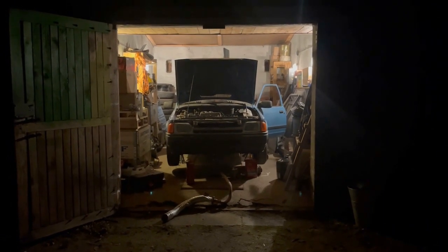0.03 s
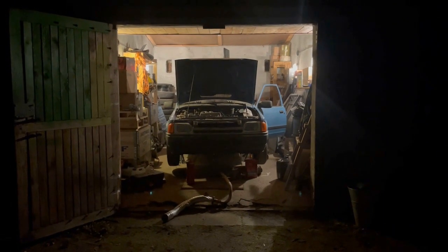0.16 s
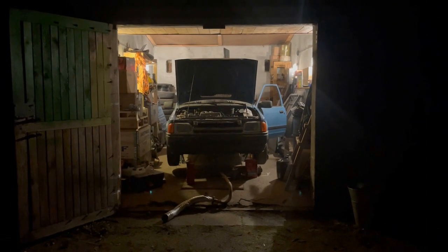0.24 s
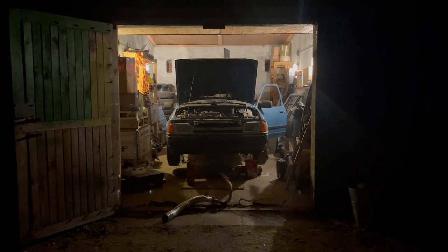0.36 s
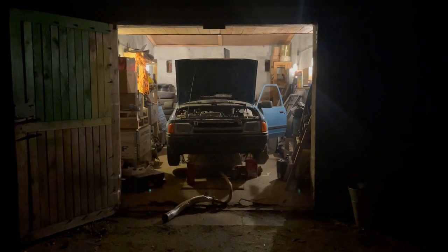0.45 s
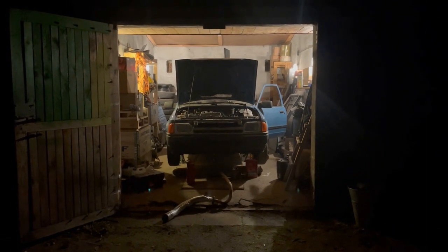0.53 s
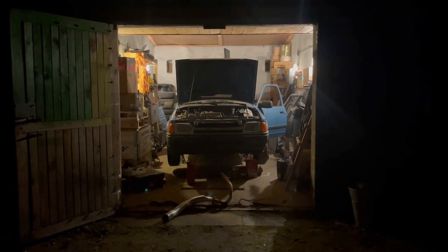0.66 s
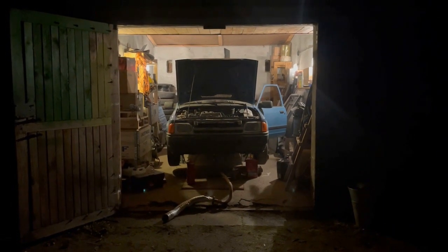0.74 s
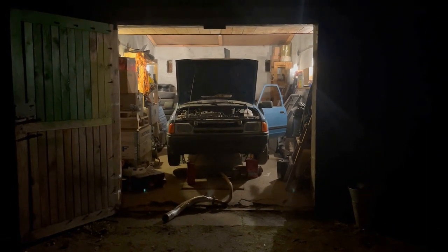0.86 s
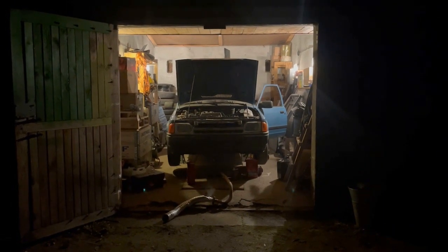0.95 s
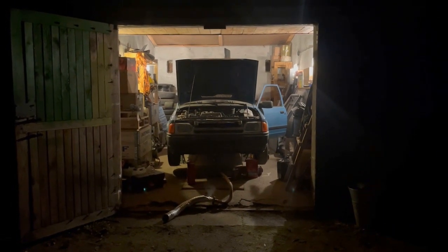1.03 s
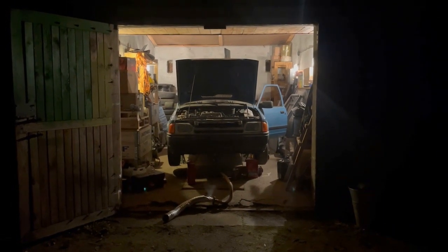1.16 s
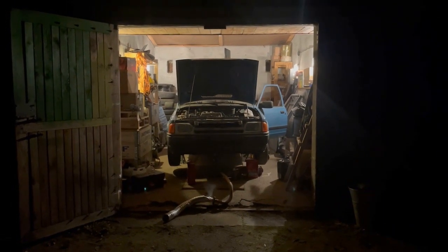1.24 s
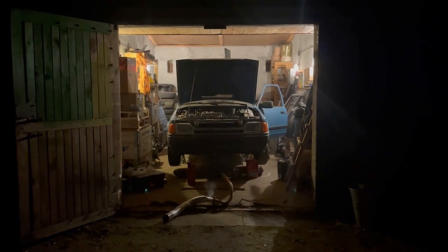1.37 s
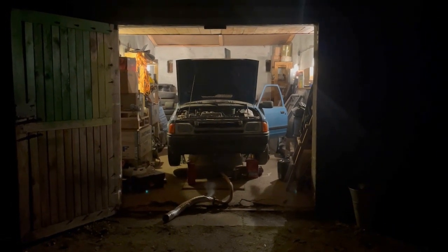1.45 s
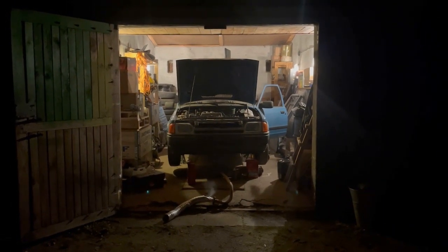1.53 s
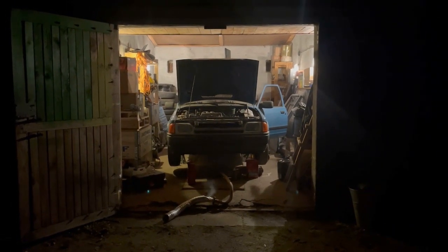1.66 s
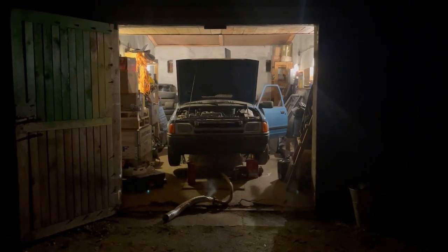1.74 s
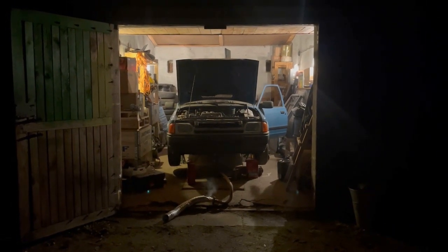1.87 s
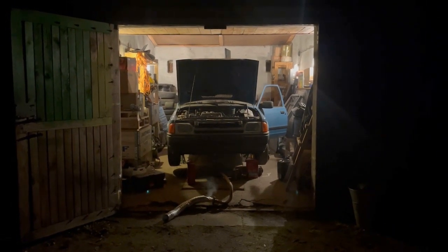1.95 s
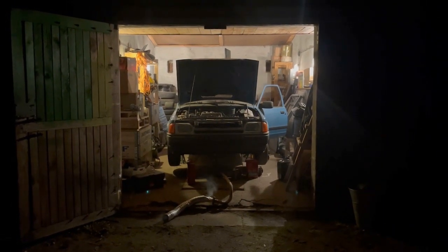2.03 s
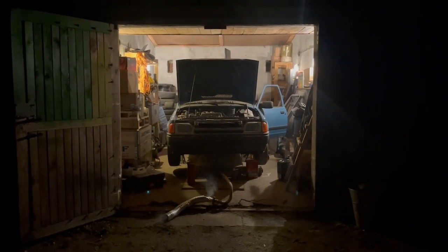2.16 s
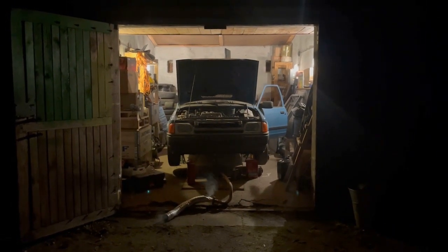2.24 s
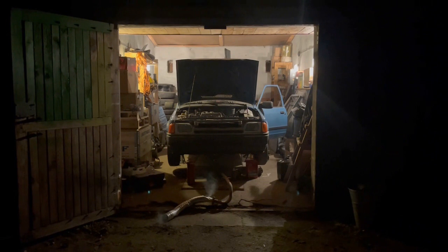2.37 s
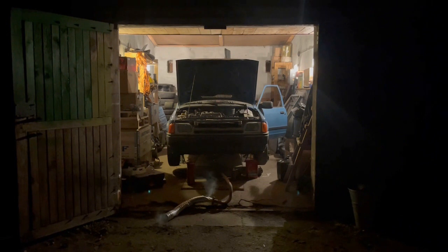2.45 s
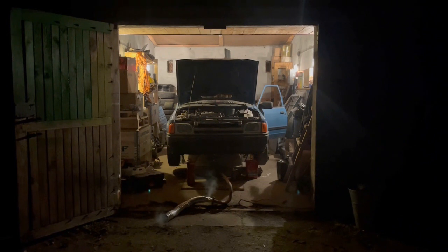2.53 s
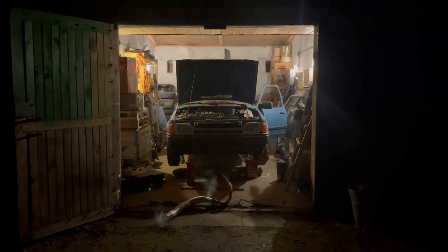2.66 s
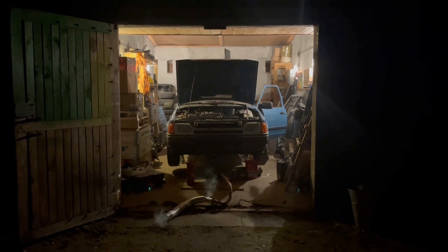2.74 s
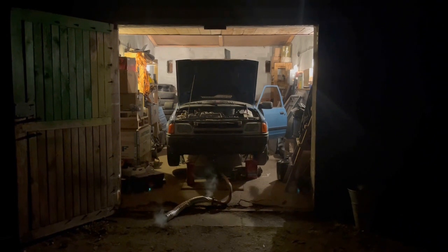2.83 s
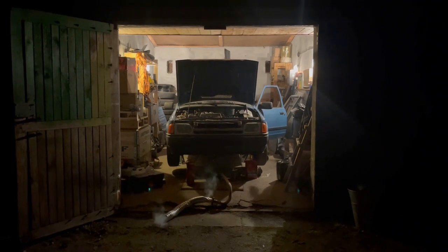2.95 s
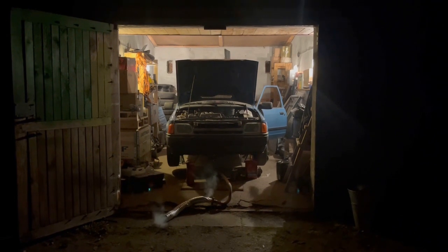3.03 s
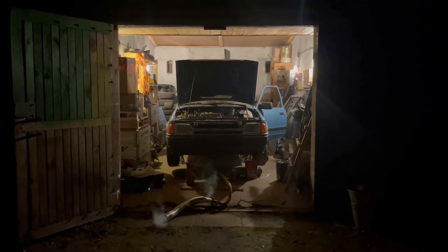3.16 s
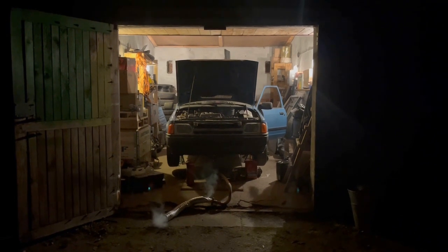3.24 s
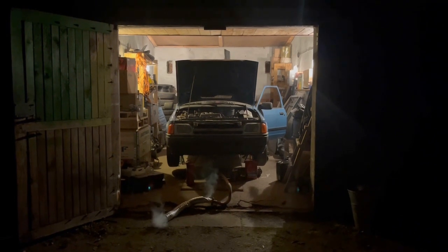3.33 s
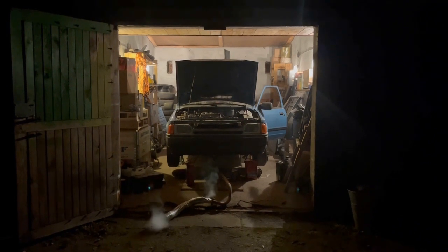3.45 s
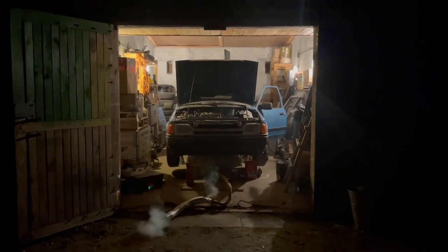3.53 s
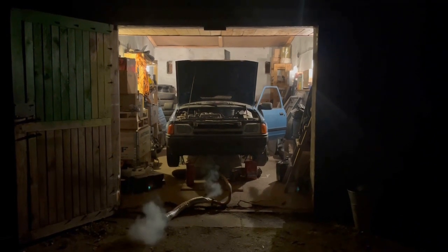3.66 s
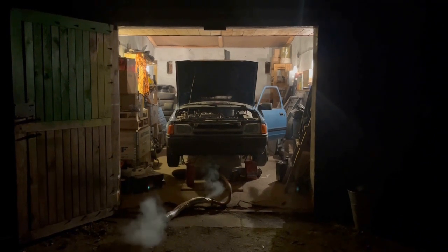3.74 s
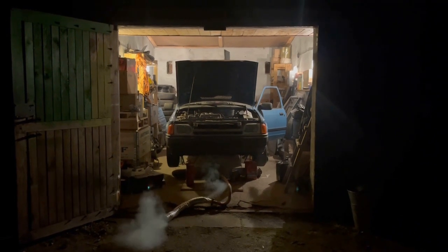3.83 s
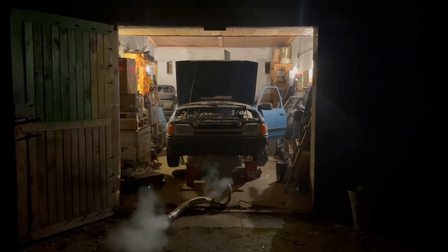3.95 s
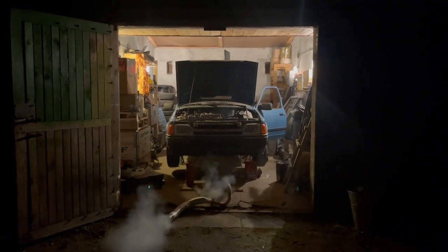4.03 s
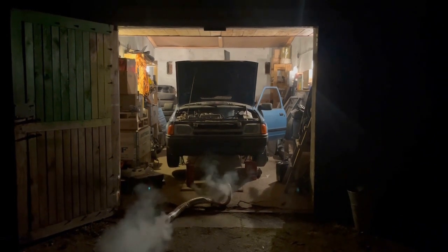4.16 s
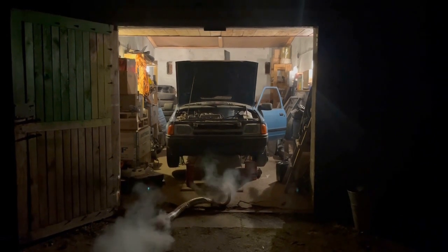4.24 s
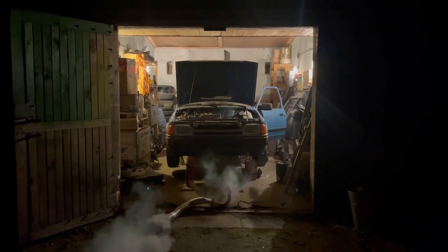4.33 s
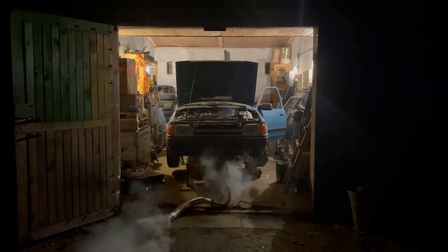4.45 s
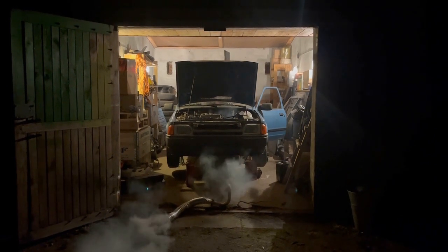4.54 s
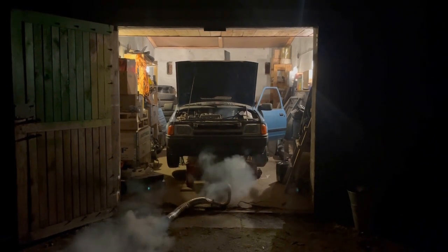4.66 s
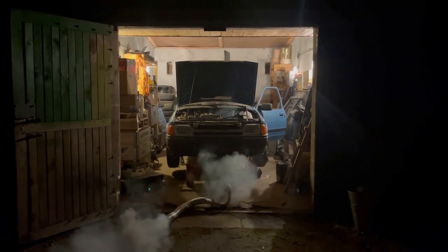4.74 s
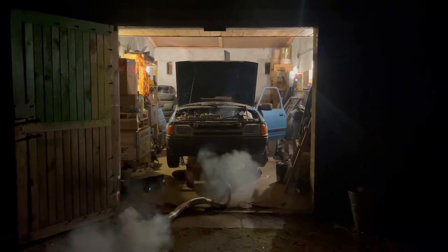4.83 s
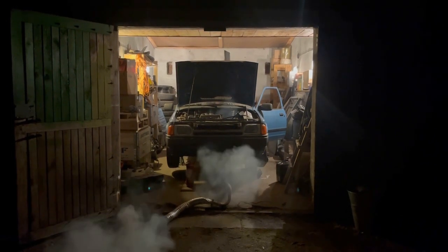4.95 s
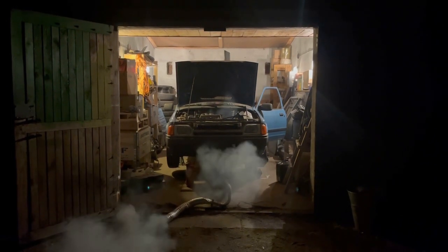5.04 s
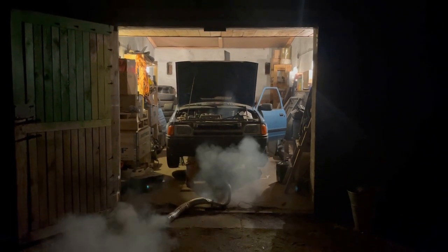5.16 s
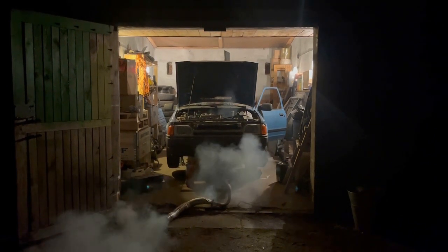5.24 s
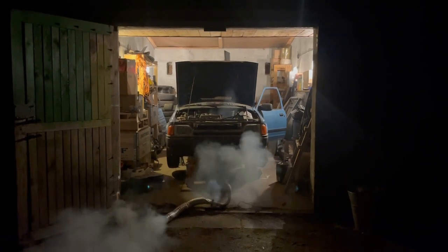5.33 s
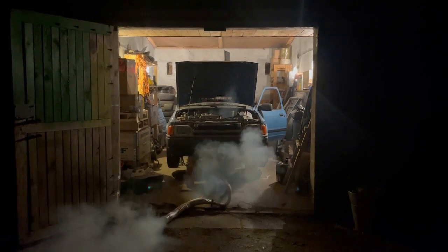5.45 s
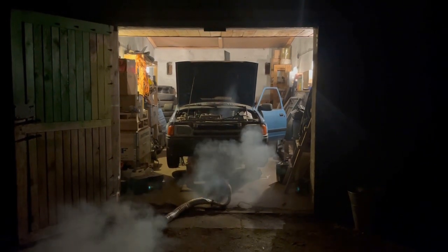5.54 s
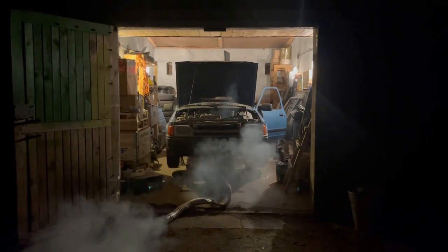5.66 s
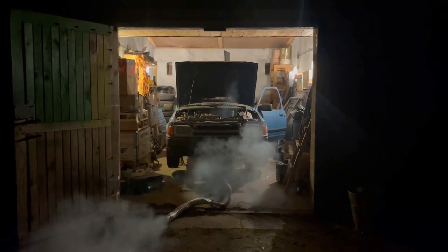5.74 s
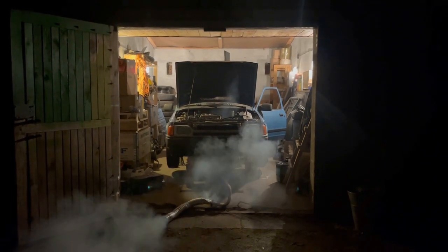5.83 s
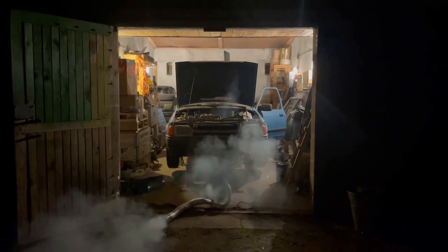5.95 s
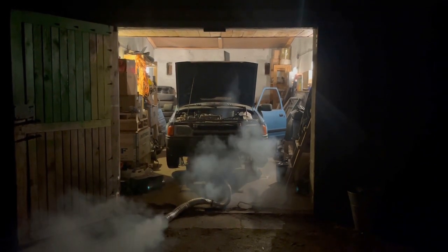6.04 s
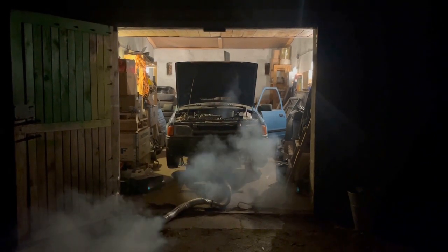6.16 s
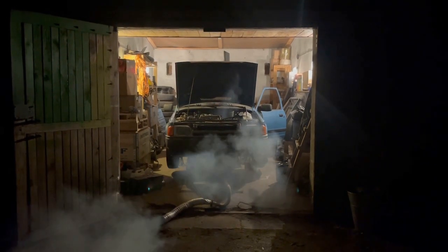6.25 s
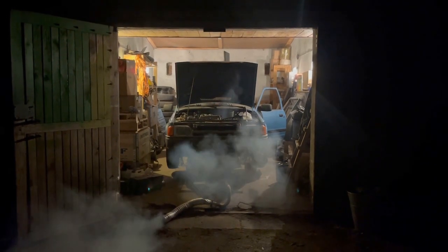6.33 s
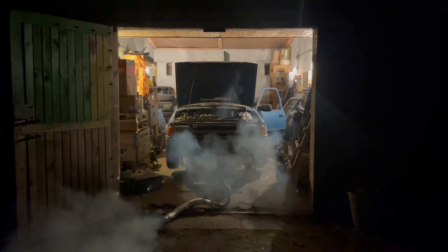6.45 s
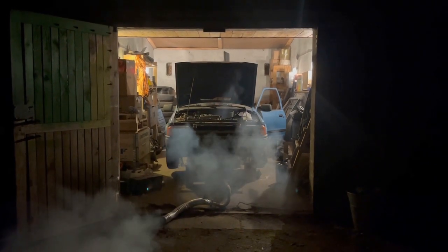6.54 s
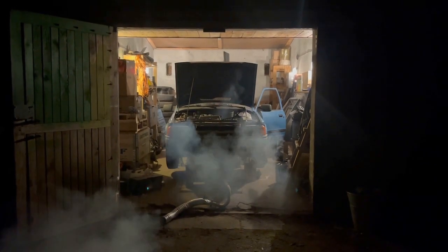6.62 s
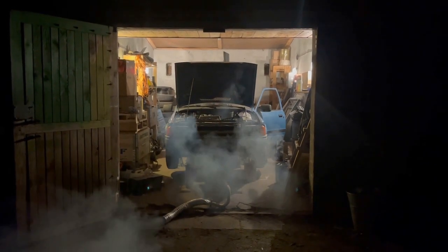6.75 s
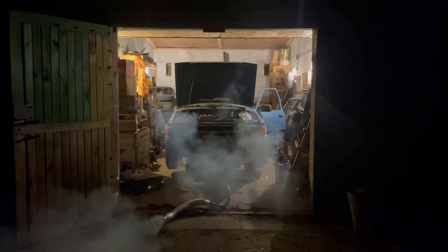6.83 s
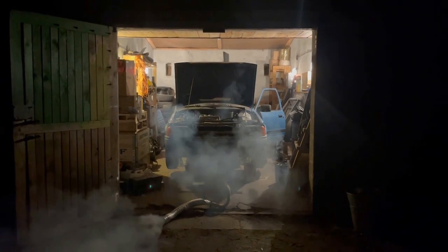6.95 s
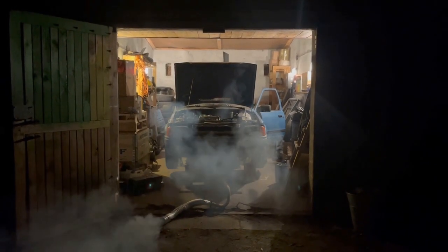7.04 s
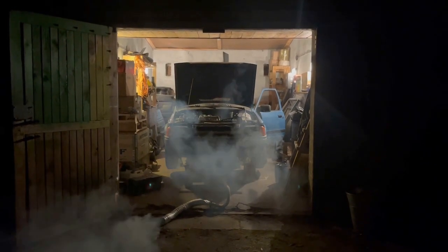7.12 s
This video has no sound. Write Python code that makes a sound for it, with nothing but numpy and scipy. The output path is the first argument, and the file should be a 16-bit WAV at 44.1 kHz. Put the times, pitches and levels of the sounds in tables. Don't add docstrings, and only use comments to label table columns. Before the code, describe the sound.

An old diesel in an open garage is heard from the yard in stereo, with faint steady air and short room reflections. From 0 to 3.4 seconds the starter turns it over about six times a second: gears bite and grind, the housing groans as it labours, then a thin whine lifts as the load lets go. At 3.4 the first separate firings crack and thump, growing harder and closer as the starter drops out by 3.6. Around 3.9 to 4.0 it catches with heavy booms and a gulp of intake air, then eases. A strong knocking push comes at 4.5 to 4.9, shorter ones at 5.2, 5.8 and 6.0 to 6.2, the last near 6.6 to 6.8 with a sharp intake rush. Between them it coasts with softer clatter, belt and fan hiss, wavering exhaust drone and hollow hose resonance, still hunting at the end, about 7.2.

```python
import sys
import numpy as np
from scipy import signal
from scipy.fft import rfft, irfft
from scipy.io import wavfile
from scipy.ndimage import uniform_filter1d

SR = 44100
rng = np.random.default_rng(int(sys.argv[2]) if len(sys.argv) > 2 else 0)


def master(y):
    cut = np.clip(np.atleast_2d(y).T, -1, 1)
    pcm = np.round(cut * 32767)
    wavfile.write(sys.argv[1], SR, pcm.astype(np.int16))


def gain_from_db(level_db):
    decades = np.asarray(level_db, float) / 20
    return 10 ** decades


N = 317079
TIME = np.arange(N) / SR

# (time [s], firings a second [Hz])
ENGINE = [(3.41, 21), (3.7, 25.2), (4.04, 50), (4.2, 66), (4.53, 42), (4.66, 54), (4.76, 55.2), (4.9, 86.4),
          (5.2, 48), (5.5, 73.7), (5.75, 42.6), (5.83, 60.3), (5.9, 53), (6.21, 82.6), (6.32, 84.5),
          (6.58, 74.3), (6.8, 102.6), (7.19, 57)]
# (start [s], end [s], effort at start [dB], effort at end [dB],
# unevenness while coasting afterwards [dB])
SURGES = [
    (3.407, 3.74, -26, -23, -30),
    (3.768, 4.127, -22.5, -28.5, -33),
    (4.33, 4.456, -37.5, -37.5, -41),
    (4.54, 4.859, -29.5, -26.5, -28.5),
    (5.237, 5.429, -28, -28, -28),
    (5.77, 5.943, -29, -34.5, -29),
    (6.026, 6.24, -32.5, -28.5, -62),
    (6.625, 6.768, -27, -29.5, -31),
]
# (time [s], crack [dB], panel pitch [Hz], boom [dB])
CATCHES = [(3.411, -20, 926, -19), (3.479, -20, 1830, -18.5), (3.538, -11, 1190, -23),
           (3.599, -13.5, 1210, -14.5), (3.654, -6, 1100, -16), (3.703, -7.5, 1050, -15),
           (3.749, -6.5, 1080, -15.5), (3.793, -8.5, 1110, -12), (3.829, -7, 1330, -16),
           (3.863, -9.5, 1300, -6), (3.894, -7.5, 1170, -15.5), (3.926, -7, 1085, -4),
           (3.951, -11, 1730, -3), (3.978, -11, 2180, -12), (4, -7, 1120, -10)]
# (time [s], crack [dB], panel pitch [Hz])
KNOCKS = [(4.04, -7, 1030), (4.078, -8.5, 1080), (4.096, -12.5, 1070), (4.112, -8, 1960),
          (4.145, -12.5, 1190), (4.54, -9.5, 1080), (4.566, -6, 1000), (4.588, -8.5, 2166),
          (4.61, -7.5, 1080), (4.649, -6, 1000), (4.736, -9.5, 1050), (4.783, -13.5, 1010),
          (4.828, -9, 1080), (5.188, -21.5, 1820), (5.227, -12.5, 1016), (5.247, -14, 1920),
          (5.281, -8, 1220), (5.376, -8.5, 1220), (5.42, -7.5, 1080), (5.754, -20, 1090),
          (5.775, -11.5, 1877), (5.811, -12.5, 1150), (5.863, -13.5, 1040), (5.909, -18, 1920),
          (6.063, -11.5, 1106), (6.133, -8, 1947), (6.197, -11.5, 1030), (6.607, -14.5, 1180),
          (6.632, -9.5, 1208), (6.763, -12, 2010)]


def evened(x):
    return x / np.sqrt(np.mean(x ** 2) + 1e-20)


def read(points, hz):
    f, value = np.transpose(points)
    return np.interp(np.log(hz + 1), np.log(f + 1), value)


def curves(rows, t=TIME):
    s, *columns = np.transpose(rows)
    return [np.interp(t, s, c) for c in columns]


def shape(x, gain):
    return irfft(rfft(x) * gain(np.fft.rfftfreq(N, 1 / SR)), N)


def noise(points):
    return evened(shape(rng.standard_normal(N), lambda hz: gain_from_db(read(points, hz))))


def decay(x, seconds):
    return signal.lfilter([1], [1, -np.exp(-1 / (seconds * SR))], x)


def resonate(x, hz, width):
    r = np.exp(-np.pi * width / SR)
    if np.ndim(hz) == 0:
        return 2 * signal.lfilter([1 - r], [1, -r * np.exp(2j * np.pi * hz / SR)], x).real
    turn = np.exp(2j * np.pi * np.cumsum(hz) / SR)
    return 2 * (turn * signal.lfilter([1 - r], [1, -r], x * turn.conj())).real


def body(x, modes):
    rung = sum((-1) ** k * gain_from_db(db) * resonate(x, hz, width) for k, (hz, width, db) in enumerate(modes))
    return rung / np.sqrt(sum(gain_from_db(2 * db) * np.pi * width * 2 / SR for _, width, db in modes))


def wander(width):
    return evened(uniform_filter1d(uniform_filter1d(rng.standard_normal(N), int(width)), int(width)))


def ramp(t, top_s, end_s, rise, fall):
    return -rise * np.maximum(top_s - t, 0) - fall * np.maximum(t - end_s, 0)


def latest(starts, places):
    return np.clip(np.searchsorted(starts, places) - 1, 0, None)


def latest_firing(at):
    return np.clip(np.searchsorted(at, np.arange(N), "right") - 1, 0, None)


def starter():
    # (time [s], peak of the grinding teeth [dB], housing [dB])
    stroke_table = [(0.0234, -38, 0), (0.184, -37, -1.4), (0.361, -35, -1.5), (0.5337, -35, -0.5),
                    (0.7108, -37.5, -2.5), (0.8762, -33, -0.4), (1.045, -39, -1.2), (1.2208, -39.5, 0.5),
                    (1.3934, -40, -0.8), (1.5589, -35, -0.8), (1.736, -37.5, -1.5), (1.904, -36, 0.3),
                    (2.0794, -39, -0.2), (2.2459, -39, -1), (2.414, -39.5, -0.3), (2.586, -38.5, 1.5),
                    (2.7647, -36, -3), (2.9212, -38, 0.2), (3.0936, -38, -1.4), (3.2667, -34.5, 0)]
    stroke_speed = [(0, 1.01), (.05, 1.04), (.42, .72), (.47, .75), (.82, .95), (1, 1.01)]
    # (pitch [Hz], width [Hz], level [dB])
    housing_modes = [(296, 70, 0), (545, 32, -3), (853, 34, -2), (1220, 110, -2), (2080, 150, -6),
                     (2550, 130, -10)]
    # (frequency [Hz], level per Hz [dB])
    grind_colour = [(59, -53), (100, -18), (177, -7.5), (214, -14), (281, -4.5), (378, -20.5), (541, -8),
                    (742, -12.5), (1210, -9), (6120, -27.5), (8410, -25.5), (11500, -36.5), (15500, -43)]
    mesh_hz, whine_hz, thud_hz = 408.4, 3105, 65.3
    bite_s, loaded_s, let_go_s = 0.0042, 0.069, .014
    s, peak_db, housing_db = np.transpose(stroke_table)
    which = latest(s, TIME)
    since = np.where(TIME < s[0], TIME - s[0] + .171, TIME - s[which])
    speed = curves(stroke_speed, since / np.r_[np.diff(s), .145][which])[0]

    throb = np.cos(2 * np.pi * (since - 0.029) / 0.0414)
    loaded = np.minimum(since, loaded_s)
    free = np.clip((since - loaded_s) / let_go_s, 0, 1)
    groan_db = 11 * throb + 60 * loaded + ramp(since, 0, loaded_s, 0, 366)
    ring_db = 1.8 + 70 * loaded - 12 * free + ramp(since, bite_s, loaded_s, 22 / bite_s, 73)
    grind_db = np.maximum(-55 * loaded + ramp(since, 0, loaded_s, 0, 256), -22)
    whine_db = 10.5 - 28 * np.clip(since / 0.039, 0, 1) + 22 * free
    thud_db = np.maximum(-6 * ((since - 0.059) / 0.028) ** 2 + 1.3 * throb, -24)
    levels = [groan_db, ring_db, grind_db, whine_db, thud_db]
    groan_db, ring_db, grind_db, whine_db, thud_db = uniform_filter1d(levels, size=90)

    turns = np.cumsum(mesh_hz * speed * (1 + .02 * wander(100))) / SR
    teeth = (np.diff(np.floor(turns), prepend=0) > 0) * gain_from_db(2.2 * rng.standard_normal(N))
    scrape = rng.standard_normal(N) * gain_from_db(4.1 * wander(60))
    drive = 0.74 * evened(teeth - teeth.mean()) + 0.68 * scrape
    groan = body(drive * gain_from_db(groan_db + housing_db[which] - 41.5), housing_modes[:3])
    ring = body(drive * gain_from_db(ring_db + housing_db[which] - 38.5), housing_modes[3:])
    mesh = np.sin(2 * np.pi * turns) * gain_from_db(ring_db + housing_db[which] - 54.5 + 2.5 * wander(140))
    grind = noise(grind_colour) * gain_from_db(grind_db + 0.29 * (peak_db[which] + 41.5) - 34 + 0.61 * wander(30))
    whine_turns = np.cumsum(whine_hz * speed * (1 + .009 * wander(60))) / SR
    whine = np.sin(2 * np.pi * whine_turns) * gain_from_db(4.5 * wander(70) - 54)
    whine *= gain_from_db(whine_db + ramp(TIME, 0, 3.39, 0, 900))
    thud_turns = thud_hz * np.cumsum(1 + 0.094 * wander(280)) / SR
    thud = np.sin(2 * np.pi * thud_turns) * gain_from_db(thud_db - 39.5 + 0.51 * wander(900))
    engaged = np.interp(TIME, [3.42, 3.62], [1, 0])
    return engaged * (groan + mesh + ring + grind + whine + thud)


def tail(t60s, late_s):
    taps = np.zeros(SR // 2)
    at = np.arange(int(late_s * SR), SR // 2 - 20, 20)
    taps[at + rng.integers(0, 20, len(at))] = rng.choice([-1., 1.], len(at))
    hz, t, z = signal.stft(taps, SR, nperseg=512)
    out = signal.istft(z * gain_from_db(-60 * t / read(t60s, hz)[:, None]), SR, nperseg=512)[1]
    return out / np.linalg.norm(out)


def garage_echo(x):
    # (frequency [Hz], time to fall by 60 dB [s])
    echo_times = [(60, 0.41), (500, 0.21), (3000, 0.12), (12000, 0.07)]
    turn = np.pi * TIME / .09
    return sum(signal.oaconvolve(x * np.cos(turn + k * np.pi / 3), tail(echo_times, .004))[:N]
               for k in range(3))


def yard_air():
    # (frequency [Hz], level [dB])
    air_colour = [(40, -56), (200, -68.5), (2000, -68), (15000, -93)]
    return gain_from_db(30.5) * shape(rng.standard_normal(N), lambda hz: gain_from_db(read(air_colour, hz)))


def firings():
    turns = np.cumsum(curves(ENGINE)[0]) / SR
    clear_s = np.array([row[0] for row in CATCHES + KNOCKS])
    clear = turns[np.r_[np.round(clear_s * SR).astype(int), N - 1]]
    number = np.r_[0, np.cumsum(np.maximum(np.round(np.diff(clear)), 1))].astype(int)
    at = np.searchsorted(turns, np.interp(np.arange(number[-1]), number, clear))
    return at, number[:-1]


def effort(fall, coast_db, late_s=0):
    t = TIME[::64] - late_s
    db = [np.interp(t, [a, b], [a_db, b_db]) + ramp(t, a, b, 497, fall) for a, b, a_db, b_db, _ in SURGES]
    both = gain_from_db(2 * np.max(db, axis=0)) + gain_from_db(2 * (coast_db + 0 * TIME)[::64])
    return np.interp(TIME, TIME[::64], 10 * np.log10(both))


def coasting(db, db_per_octave):
    return db + db_per_octave * np.log2(curves(ENGINE)[0] / 74.4)


def fuel_level():
    return effort(160, coasting(-41, 5.7))


def unevenness():
    return np.transpose(SURGES)[-1][latest(np.transpose(SURGES)[0], TIME)]


def sag(at):
    since = TIME - TIME[at][latest_firing(at)]
    return -uniform_filter1d(209 * since * np.interp(curves(ENGINE)[0], [19, 30], [1, 0]), size=200)


def knock(at, clear):
    # (pitch [Hz], width [Hz], level [dB])
    block_modes = [(827, 133, -0.5), (1080, 29, -4), (1920, 190, -2), (2716, 13, -3), (3630, 360, -12.5),
                   (4800, 32, -25)]
    # (frequency [Hz], level per Hz [dB])
    crack_colour = [(260, -2), (450, -8), (614, -5), (802, -0.5), (903, -15), (1060, -1.5), (1580, -14.5),
                    (1860, -6.5), (2510, -11), (6100, -20), (8320, -19), (11500, -26.5), (15500, -59)]
    panel_pitches = [1090, 1892]

    def chance():
        return rng.standard_normal(len(at))

    fuel_db = fuel_level()[at]
    peak_db = fuel_db + 15.0 + 1.4 * chance()
    peak_db -= np.interp(fuel_db, [-40, -33], [16, 0])
    low_hz = np.where(chance() < .3, *panel_pitches) * np.exp(0.071 * chance())
    high_hz = 3100 * np.exp(0.217 * chance())
    panel_db = 2.3 * chance()
    peak_db[clear], low_hz[clear] = np.transpose([row[1:3] for row in CATCHES + KNOCKS])
    panel_db[clear] = -.6 * (peak_db[clear] - fuel_db[clear] - 15)
    blows = np.zeros(N)
    blows[at] = gain_from_db(peak_db)

    crack = gain_from_db(-7.0) * uniform_filter1d(decay(blows, 0.005), 30) * noise(crack_colour)
    dull = np.interp(curves(ENGINE)[0], [22, 55], [.75, 0])
    crack = (1 - dull) * crack + dull * uniform_filter1d(crack, size=9)
    which = latest_firing(at)
    quick = decay(blows, 0.0062) * rng.standard_normal(N)
    ring = sum(resonate(quick * gain_from_db(db + 3 * chance()[which]), hz, 1.6 * width)
               for hz, width, db in block_modes)
    low = resonate(resonate(blows * gain_from_db(panel_db[which]), low_hz[which], 93), low_hz[which], 195)
    high = resonate(resonate(blows, high_hz[which], 75), high_hz[which], 290)
    struck = crack + gain_from_db(0.5) * ring + gain_from_db(30.0) * low + gain_from_db(23.0) * high
    return shape(struck, lambda hz: 1 / np.sqrt(1 + (hz / 7000) ** 3))


def valve_rattle(at):
    # (frequency [Hz], level per Hz [dB])
    rattle_colour = [(260, -2), (450, -8), (614, -5), (802, -0.5), (903, -15), (1060, -1.5), (1580, -14.5),
                     (1860, -6.5), (2510, -11), (6100, -20), (8320, -19), (11500, -26.5), (15500, -59)]
    fuel_db = fuel_level()
    gap_db = np.interp(fuel_db, [-38, -30], [0, -4])
    rattle = noise(rattle_colour) * gain_from_db(fuel_db + gap_db + sag(at) - 4.5 + wander(80))
    return rattle * (TIME > SURGES[0][0])


def gas_puffs(at):
    cylinder_levels = [3.4, 1, 8, -4.5]
    rate = curves(ENGINE)[0]
    uneven_db = np.resize(cylinder_levels, len(at)) * np.interp(rate[at], [28, 45], [0, 1])
    puffs = np.zeros(N)
    puffs[at] = gain_from_db(uneven_db + 1.6 * rng.standard_normal(len(at)))
    return puffs / np.sqrt(rate / SR)


def exhaust_hose(at, puffs):
    # (pitch [Hz], width [Hz], level [dB])
    hose_modes = [(296.4, 107, -5.5), (349.5, 59, 0.46), (410, 23.4, 0)]
    rate = curves(ENGINE)[0]
    flow = decay(puffs * np.sqrt(rate), 0.0033) * rng.standard_normal(N)
    hose = body(puffs + 0.24 * evened(flow) + 0.3 * rng.standard_normal(N), hose_modes)
    hose = shape(hose, lambda hz: 1 / np.sqrt(1 + (hz / 440) ** 16) / np.sqrt(1 + (240 / (hz + 1)) ** 4))
    cycle = np.interp(np.arange(N), at, np.arange(len(at))) % 1
    hose = hose * gain_from_db(uniform_filter1d(9 * (.5 - cycle), size=60) * np.interp(rate, [60, 85], [1, 0]))
    return hose * gain_from_db(hose_level(at) + 2)


def hose_level(at):
    slow_db = np.interp(curves(ENGINE)[0], [22, 34], [6, 0])
    return effort(110, coasting(-44.5, 14)) + 4 + 3.9 * sag(at) - slow_db


def slowness():
    return np.interp(curves(ENGINE)[0], [32, 50], [1, 0])


def silencer(at, puffs):
    # (pitch [Hz], width [Hz], level [dB])
    silencer_modes = [(69.2, 13.5, -2.5), (113.4, 11.3, -1), (170.5, 21, -0.5)]
    # (pitch [Hz], width [Hz], level [dB])
    first_modes = [(70.7, 10, 0), (138, 46, -6.5)]
    s, _, _, boom_db = np.transpose(CATCHES)
    boom_db = uniform_filter1d(boom_db[latest(s, TIME)], size=200) + .8 * sag(at)
    first_db = np.where(TIME < SURGES[1][1], boom_db, hose_level(at) + 15.5)
    first = resonate(body(puffs, first_modes), 73, 52) * gain_from_db(first_db)
    thump = body(puffs + .35 * rng.standard_normal(N), silencer_modes)
    thump = uniform_filter1d(uniform_filter1d(thump, size=40), size=30)
    thump *= gain_from_db(effort(97.96, np.maximum(unevenness() - 5, -41)) + 1.5)
    return slowness() * first + (1 - slowness()) * thump


def exhaust_tones():
    # (frequency [Hz], gain [dB])
    pipe_gain = [(40, -5), (55, -3), (75, 4), (115, 5), (170, 2.2), (215, -7), (310, -13), (430, -3.5)]
    # (multiple of the firing rate [1], level [dB])
    whirr_orders = [(3, -43), (4.5, -37)]
    rate, uneven_db, idle_db = curves(ENGINE)[0], unevenness(), -56
    orders_db = [effort(94.86, coasting(-34, 2.2), .12) + 0.07,
                 effort(200, uneven_db - 15.5) + 1.5,
                 effort(260, uneven_db - 18) + 2.0,
                 effort(180, idle_db) + 12 * np.log2(rate / 90) + 7.5,
                 effort(450, idle_db) + 9 * np.log2(rate / 90) + 2]
    turns = 2 * np.pi * np.cumsum(rate) / SR
    cold = (TIME < 6.05) * np.interp(effort(250, idle_db), [-42, -34], [1, 0])
    waver_db = 1.3 + 4 * cold
    tones = np.zeros(N)
    for order, db in enumerate(orders_db, 1):
        hz = order * rate
        db = db + read(pipe_gain, hz) + ramp(hz, 0, 435, 0, 0.52)
        tones += gain_from_db(db + 3.0 + waver_db * wander(550)) * np.sin(order * turns)
    whirr = sum(gain_from_db(db + 2 * wander(600)) * np.sin(order * turns) for order, db in whirr_orders)
    tones += gain_from_db(ramp(TIME, 6.3, 6.58, 343, 585)) * whirr
    return (1 - slowness()) * tones


def belts_and_fan():
    # (frequency [Hz], level per Hz [dB])
    hiss_colour = [(1500, -14), (4000, -2), (7000, -2.2), (12000, -5), (15500, 0)]
    hiss_db = effort(170, -48.5) * 0.63 - 30 + ramp(TIME, SURGES[0][0], 6.8, 2000, 30)
    return noise(hiss_colour) * gain_from_db(hiss_db)


def intake():
    # (time of the top [s], level [dB], rise [dB/s], fall [dB/s])
    gulp_table = [
        (3.92, -27.5, 130, 91),
        (6.1, -44, 188, 37),
        (6.58, -39, 165, 45),
        (6.75, -28, 103, 350),
        (7.19, -37.5, 155, 100),
    ]
    air = evened(resonate(resonate(rng.standard_normal(N), 2460, 730), 1880, 1200))
    return air * sum(gain_from_db(db + ramp(TIME, s, s, rise, fall)) for s, db, rise, fall in gulp_table)


def scene():
    at, clear = firings()
    puffs = gas_puffs(at)
    running = np.interp(TIME, [3.39, 3.41], [0, 1])
    exhaust = running * (exhaust_hose(at, puffs) + silencer(at, puffs))
    dry = starter() + knock(at, clear) + valve_rattle(at) + exhaust + belts_and_fan() + intake()
    mix = dry + gain_from_db(-11.0) * garage_echo(dry) + running * exhaust_tones() + yard_air()
    return np.tile(mix, (2, 1))


def top_cut(x):
    return signal.sosfilt(signal.butter(12, 15740, fs=SR, output="sos"), x)


def record(dry):
    # (frequency [Hz], level [dB])
    port_levels = [(60, -4), (110, 2), (200, -2), (380, 0.0), (700, 5), (1290, 6.5), (2380, 0.5), (4400, 6),
                   (8120, 2), (15000, -1.5)]
    # (frequency [Hz], phase [rad])
    port_phases = [(0, 0.036), (1290, 0.96), (1720, 0.72), (3100, 1.15), (4300, 1.22), (5250, 1.8),
                   (6120, -1.44),
                   (8350, -np.pi), (11800, -2 * np.pi), (15300, -3 * np.pi)]
    # (frequency [Hz], level [dB])
    scatter_levels = [(60, -28), (300, -20), (700, -10), (1500, -7), (4000, -4), (8400, -2), (11300, -20),
                      (14000, -7)]
    hz = np.fft.rfftfreq(N, 1 / SR)
    lead = np.interp(hz, *np.transpose(port_phases))
    half = gain_from_db(read(port_levels, hz) * (hz > 300) / 2) * np.exp(.5j * lead)
    bins, _, z = signal.stft(dry[0], SR, nperseg=256)
    z = z * np.exp(2j * np.pi * rng.random(z.shape)) * gain_from_db(read(scatter_levels, bins))[:, None]
    unlike = rfft(signal.istft(z, nperseg=256)[1][:N])
    cut = 1 / np.sqrt(1 + (46 / (hz + 1)) ** 8) * (hz < 15750)
    cut = cut * gain_from_db(-6 * np.exp(-((hz - 8300) / 750) ** 2))
    ports = irfft((rfft(dry) * [half, 1 / half] + [unlike, -unlike]) * cut, N)
    return top_cut(0.69 * np.tanh(ports / 0.71))


dry = scene()
out = record(dry)
master(out)
```